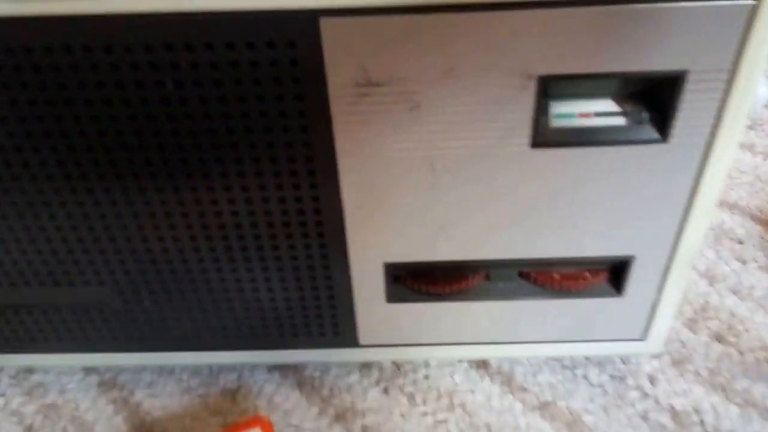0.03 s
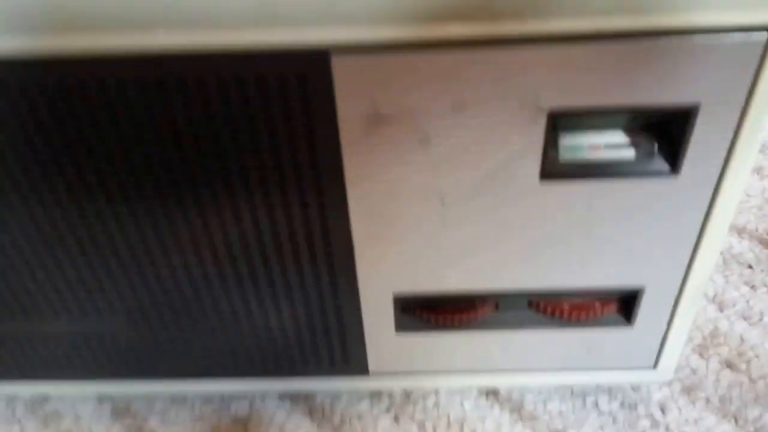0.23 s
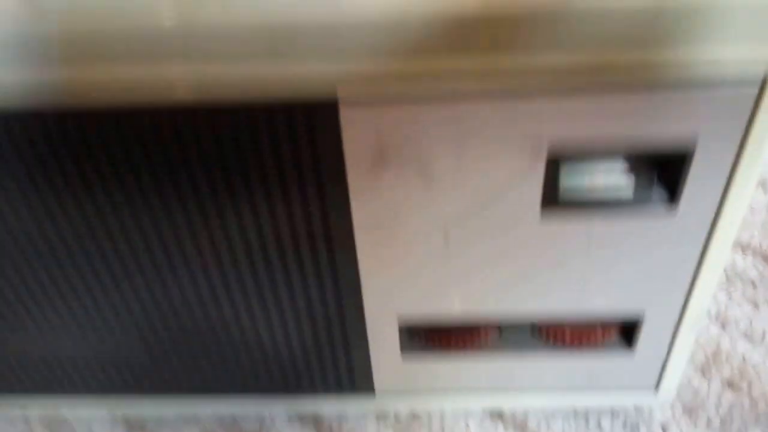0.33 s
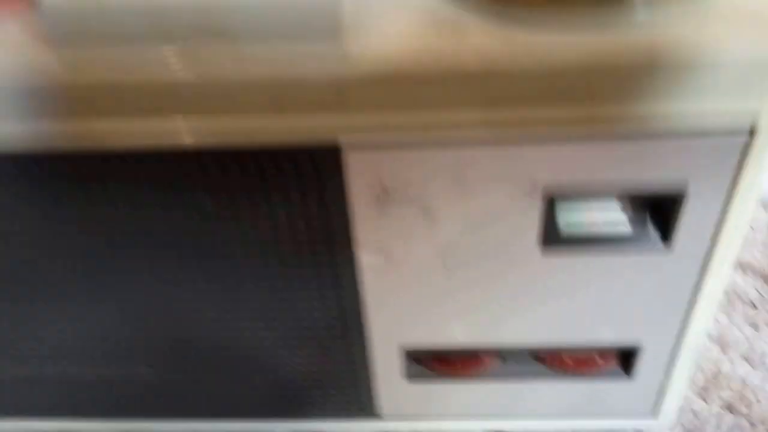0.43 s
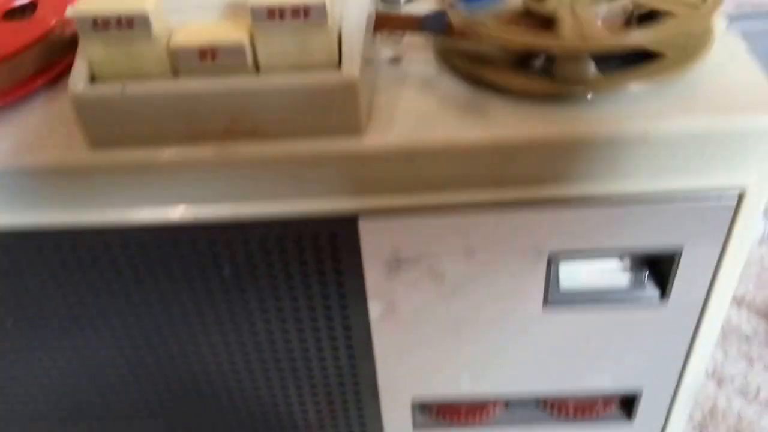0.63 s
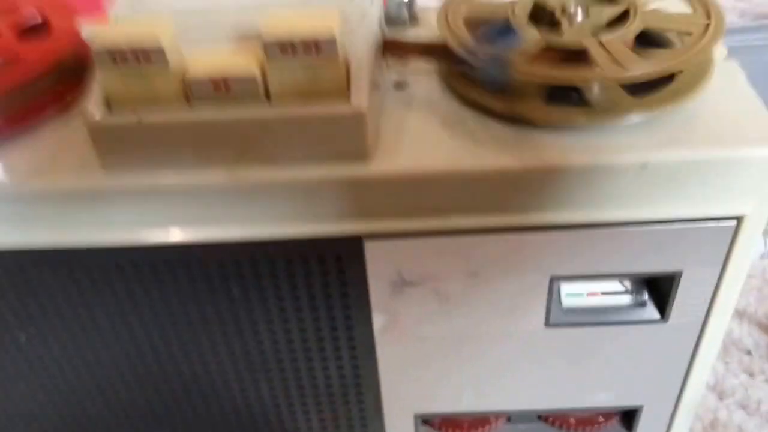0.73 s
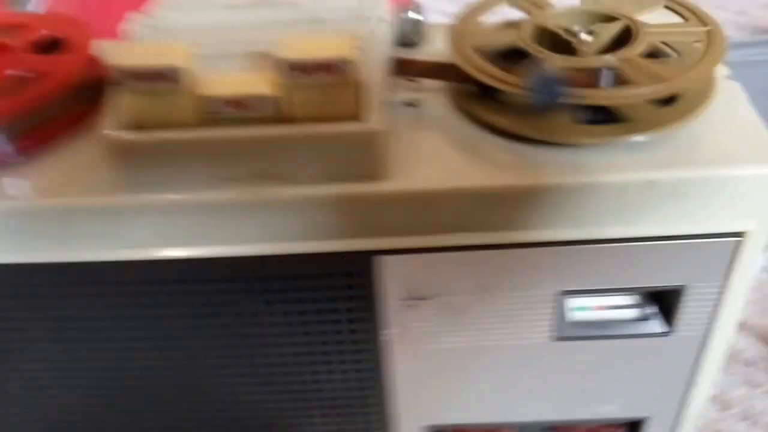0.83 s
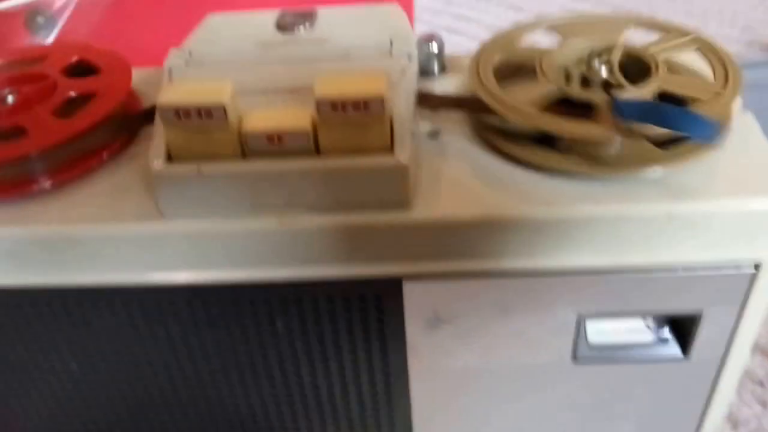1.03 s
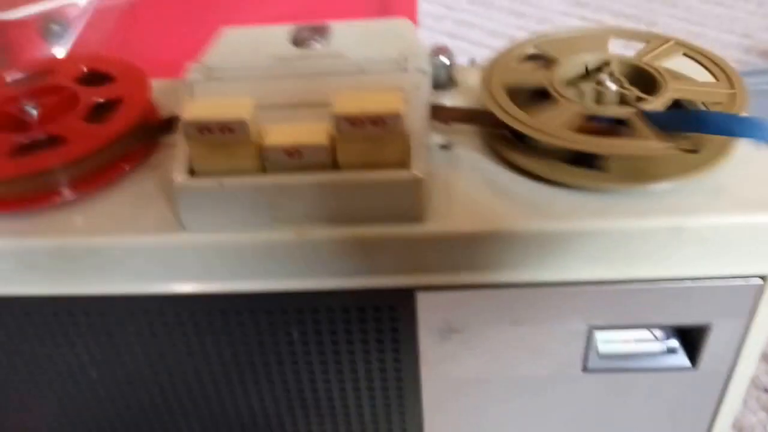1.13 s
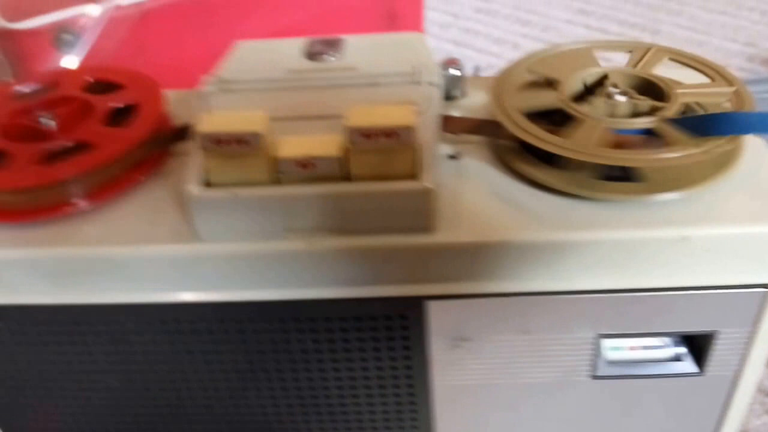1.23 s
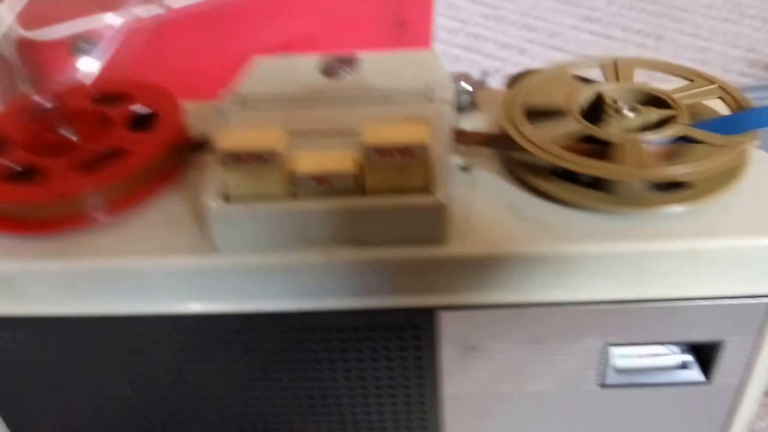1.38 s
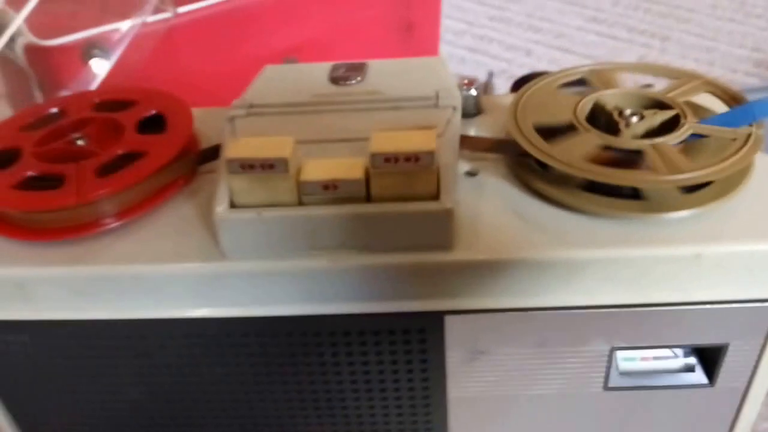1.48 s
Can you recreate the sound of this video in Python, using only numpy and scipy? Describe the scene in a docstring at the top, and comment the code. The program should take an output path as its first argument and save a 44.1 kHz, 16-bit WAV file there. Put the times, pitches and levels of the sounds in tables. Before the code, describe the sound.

A small reel-to-reel tape machine runs throughout in a quiet room, with a low hum and soft knocks about thirteen times a second. Rubbing and ticks at the microphone's left end in a loud, sharp click and dull thump at 0.25 seconds. Faint tape hiss follows, with a thin whistle near 0.5 seconds and light handling ticks. The machine grows slightly quieter, and tiny high reel chirps come from 1.2 seconds.

```python
"""Small reel-to-reel, up close

A tape machine runs in a quiet room: its motor hums and a wheel knocks in the cabinet once a turn.
A hand-held microphone drifts over it; something rubs, then clicks sharply with a thump at the
microphone's left port. Afterwards the tape hisses faintly and the reels tick and chirp."""
import sys
import numpy as np
from scipy import signal
from scipy.fft import rfft, irfft
from scipy.io import wavfile

SR = 44100
rng = np.random.default_rng(int(sys.argv[2]) if len(sys.argv) > 2 else 0)


def log_audio(samples):
    """Write samples as a 16-bit WAV file to the path given in sys.argv[1]."""
    # one column per channel
    frames = np.atleast_2d(samples).T
    # limit to full scale, then quantise
    limited = np.clip(frames, -1, 1)
    pcm = np.round(limited * 32767).astype(np.int16)
    wavfile.write(sys.argv[1], SR, pcm)


N = 68355


def amp(db):
    """Decibels to gain."""
    return 10 ** (np.asarray(db) / 20)


def clock():
    """Time of each sample in seconds."""
    return np.arange(N) / SR


def curve(rows):
    """One automation lane per column, with straight ramps."""
    times, *columns = np.array(rows, float).T
    return [np.interp(clock(), times, c) for c in columns]


def pan(x, db):
    """Pan by turning the far side down; positive is left."""
    return x * amp(np.array([np.minimum(db, 0), np.minimum(-db, 0)]).reshape(2, -1))


def response(eq):
    """Minimum-phase click with the given EQ, peak 1."""
    hz, db = np.array(eq, float).T
    size = 2 ** 12
    bins_hz = np.arange(size // 2 + 1) * SR / size
    gain = amp(np.interp(np.log(bins_hz + 1), np.log(hz), db))
    cepstrum = irfft(np.log(gain))
    cepstrum[1:size // 2] *= 2
    cepstrum[size // 2 + 1:] = 0
    impulse = irfft(np.exp(rfft(cepstrum)))
    return impulse / np.abs(impulse).max()


def through(x, impulse):
    """Play x through an impulse response."""
    return signal.fftconvolve(x, impulse)[:N]


def noise(eq):
    """Coloured noise, rms 1."""
    y = irfft(rfft(rng.standard_normal(N)) * rfft(response(eq), N), N)
    return y / y.std()


def wide(eq, mono):
    """Stereo noise with a mono share common to both sides."""
    return np.sqrt(mono) * noise(eq) + np.sqrt(1 - mono) * np.array([noise(eq), noise(eq)])


def walk(rate_hz):
    """Random wander, spread near 1."""
    steps = rng.standard_normal(2 ** 11)
    return np.interp(clock() * rate_hz, np.arange(len(steps)), steps)


def pulses(rows):
    """One impulse for each (time [s], level [dB])."""
    y = np.zeros(N)
    for s, db in rows:
        y[int(np.clip(s * SR, 0, N - 1))] += amp(db)
    return y


def ring(modes):
    """Sum of decaying modes."""
    t = clock()
    return sum(amp(db - 60 * t / t60) * np.sin(2 * np.pi * hz * t) for hz, db, t60 in modes)


def burst(age, rise, hold, fall):
    """Envelope that swells up to age 0, holds and dies away; times in seconds."""
    return np.exp(np.minimum(age, 0) / rise - np.maximum(age - hold, 0) / fall)


# Room tone EQ (frequency [Hz], gain [dB])
ROOM_EQ = [(25, 1), (60, -7.5), (140, 6.5), (300, 3), (800, -10.5), (1300, -2), (2500, -11), (5000, -14),
           (7000, -21.5), (8500, -25.5), (14500, -27.5), (15500, -54.5)]

def room():
    """A wide, quiet bed of room air."""
    return wide(ROOM_EQ, mono=0.067) * amp(-70.5)


# Fader ride on the cabinet's low ring (time [s], gain [dB], pan [dB])
DRIFT = [(0, 2, 6), (.3, 2, 4), (.55, 0.5, 6.5), (.85, -4.5, 2.5), (1.2, -8.5, 0.5), (1.55, -9, 0)]

def mic_drift(x):
    """The sound fades and centres as the microphone moves away."""
    db, side = curve(DRIFT)
    return pan(x * amp(db), side)


# Hum at the microphone (time [s], level [dB], pan [dB])
HUM_RIDE = [(0.0, -51.5, 12), (0.056, -54.5, 9.5), (0.084, -78, 3), (0.114, -54.5, 8), (0.21, -52.5, 3),
            (0.32, -52, 4.0), (0.696, -57, 5), (0.894, -56.5, 2.5), (0.966, -57.5, 7), (1.046, -65.5, -2),
            (1.084, -57, 1), (1.114, -75, 0.5), (1.144, -59, 2.5), (1.2, -56, 4.0), (1.258, -69, -2),
            (1.286, -62.5, 2.0), (1.326, -71, -1.0), (1.382, -54, 0), (1.454, -59.5, 4.0), (1.55, -69, 0.0)]
# Lesser drive tones (frequency [Hz], level [dB])
DRIVE_TONES = [(69.6, -24.5), (118.8, -20.5), (247.4, -22), (279, -22.5)]

def motor():
    """The motor hums, fluttering and sagging slightly; weaker drive tones follow its speed."""
    hum_hz, sag_hz_per_s, flutter = 169.9, 0.9, 0.0013
    speed = (1 - sag_hz_per_s * clock() / hum_hz) * (1 + flutter * walk(36))
    phase_per_hz = 2 * np.pi * np.cumsum(speed) / SR
    db, side = curve(HUM_RIDE)
    hum = np.sqrt(2) * amp(db + 0.5 + np.abs(side) / 3) * np.sin(hum_hz * phase_per_hz)
    tones = sum(amp(level + 2 * walk(6.1)) * np.sin(hz * phase_per_hz + rng.uniform(0, 2 * np.pi))
                for hz, level in DRIVE_TONES)
    return pan(hum, side) + mic_drift(tones * amp(-47.5))


# Drive rumble EQ (frequency [Hz], gain [dB])
RUMBLE_EQ = [(25, -21), (70, -13), (130, 0.5), (220, -10.5), (330, -12), (520, -0.5), (760, -20),
             (1200, -16), (2200, -34), (8000, -51)]

def rumble():
    """Low running noise of the drive."""
    return mic_drift(wide(RUMBLE_EQ, mono=0.73) * amp(-60.5))


# Rub fader ride (time [s], level [dB])
RUB_RIDE = [(0, -54), (.025, -55), (.045, -66.5), (.085, -56), (.13, -63), (.19, -64), (.22, -64),
            (.238, -45.5), (.262, -55), (.28, -63), (.31, -80.5)]
# Rub EQ (frequency [Hz], gain [dB])
RUB_EQ = [(25, -1.5), (100, 13), (250, 4), (700, 0.5), (1800, -11), (4500, -11.5), (5800, -15),
          (7200, -53.5), (16000, -49.5)]

def rub():
    """Grainy rubbing at the left port."""
    friction = noise(RUB_EQ) * amp(curve(RUB_RIDE)[0] + 5.5 + 0.87 * walk(300))
    return pan(friction, db=35)


# Knock accents, one per turn (level [dB])
KNOCK_ACCENTS = [-0.12, 2.6, 1.7, 2, 0.98, 2.1, 1.8, 0.83, 2, 0.45, -0.84, 0.9, -0.94, -1.73, 1.8, -0.62,
                 -2.3, 0.97, 0.26, -0.64]
# Cabinet resonances (frequency [Hz], level [dB], t60 [s])
CABINET_MODES = [(433, -10.5, 0.2), (468, -1, 0.15), (514, 0, 0.16), (537, -7, 0.14), (625, 1.5, 0.17),
                 (828, -10.5, 0.045), (1106, -8, 0.062), (1212, -6.5, 0.048), (1310, -20.5, 0.022),
                 (1473, -13.5, 0.053), (1707, -10.5, 0.02), (1990, -11, .022)]
# Softer throbs after each knock (delay [s], frequency [Hz], level [dB])
THROBS = [(0.029, 520.7, 2), (.043, 522, -4), (.056, 470.3, -3.5)]
# Panel bounces on each knock (delay [s], level [dB])
BOUNCES = [(0, -2), (.0058, -9.5), (.0116, -6.5)]
# Loose-part chatter EQ (frequency [Hz], gain [dB])
CHATTER_EQ = [(200, -24), (500, -1.5), (800, -13.5), (1250, 10), (1550, -3.5), (2050, -5), (2600, -20),
              (16000, -52)]

def wheel():
    """One soft knock a turn rings the cabinet, rattles its panels and shakes loose parts."""
    first_s, turn_s, attack_s, throb_width_s, crossover_hz = 0.0407, 0.07702, 0.001, 0.0051, 750
    t = clock()
    knocks = pulses(zip(first_s + turn_s * np.arange(len(KNOCK_ACCENTS)), KNOCK_ACCENTS))
    attack = 1 - np.exp(-(t / attack_s) ** 2)
    throbs = sum(amp(db) * np.exp(-((t - s) / throb_width_s) ** 2) * np.sin(2 * np.pi * hz * t)
                 for s, hz, db in THROBS)
    low_ring = attack * ring(m for m in CABINET_MODES if m[0] < crossover_hz)
    high_ring = attack * ring(m for m in CABINET_MODES if m[0] >= crossover_hz)
    body = through(knocks, low_ring + throbs) * amp(-53)
    panels = through(through(knocks, pulses(BOUNCES)), high_ring) * amp(-53)
    shake = through(knocks, attack * burst(t, rise=1, hold=0.006, fall=0.011))
    chatter = wide(CHATTER_EQ, mono=0.23) * shake * amp(-62.5)
    return mic_drift(body) + pan(panels + chatter, db=2 - 3 * t)


# Handling tick cues (time [s], level [dB], pan [dB])
TICK_CUES = [(0.0661, -28.5, 31), (0.1555, -27, 43), (0.2002, -47, 10), (0.2392, -23, 22),
             (0.753, -48, -26), (0.8877, -40, -27.5), (0.9098, -45, -31), (.9150, -40.5, -31),
             (1.0145, -44.5, -26), (1.029, -47.5, -12), (1.441, -48, -26)]
# Tick EQ (frequency [Hz], gain [dB])
TICK_EQ = [(100, -3), (800, 1), (2500, 5), (4500, 1.5), (5800, -5.5), (7500, -31), (15000, -43.5)]

def ticks():
    """Dry handling ticks; the harder the pan, the tighter the noise tail."""
    out = 0
    for s, db, side in TICK_CUES:
        envelope = burst(clock() - s, rise=0.0002, hold=0, fall=0.0051 * amp(-abs(side) / 2))
        tail = 0.075 * amp(db) * rng.standard_normal(N) * envelope
        out += pan(through(pulses([(s, db)]) + tail, response(TICK_EQ)), side)
    return out


# Snap cues (time [s], peak [dB])
SNAP_CUES = [(.2449, -30.5), (.2484, -18), (.2541, -35), (.2571, -4.5)]
# Snap and scrape EQs (frequency [Hz], gain [dB])
SNAP_EQ = [(100, -21), (1000, -28), (2500, -10.5), (4000, -4), (5400, 3.5), (6500, -0.5), (8000, -17.5),
           (11000, -21), (15000, -20.5), (16500, -39.5)]
SCRAPE_EQ = [(40, -16), (250, 7.5), (330, -2.5), (430, 1.5), (550, 7.5), (760, -6.5), (1250, 0.5),
             (1800, -10), (4000, -7), (6200, -9), (8000, -32), (15000, -32), (16500, -39)]

def click():
    """A few hard snaps around a short scrape, right at the left port."""
    envelope = burst(clock() - 0.2495, rise=0.002, hold=0.011, fall=0.0017)
    scrape = noise(SCRAPE_EQ) * amp(-24) * envelope
    snaps = through(pulses(SNAP_CUES), response(SNAP_EQ))
    return pan(scrape + snaps, db=43.5)


# Thump cues (time [s], level [dB], starting pitch [Hz], t60 [s], pan [dB])
THUMP_CUES = [(0.2563, -13.5, 103.6, 0.038, 37.5), (1.0191, -36, 112, 0.021, -23)]

def thumps():
    """Dull thumps through the microphone body, sagging in pitch."""
    sag_per_s, attack_s = 20, 0.0027
    out = 0
    for s, db, hz, t60, side in THUMP_CUES:
        age = np.maximum(clock() - s, 0)
        phase = 2 * np.pi * np.cumsum(hz * (age > 0) / (1 + sag_per_s * age)) / SR
        envelope = (1 - np.exp(-age / attack_s)) * amp(-60 * (age / t60) ** 1.71)
        out += pan(amp(db) * envelope * np.sin(phase), side)
    return out


# Hiss fader ride (time [s], level [dB])
BRUSH_RIDE = [(0, -123), (.26, -71.5), (.33, -75.5), (.42, -74), (.48, -73), (.56, -75), (.68, -74.5),
              (.76, -77), (1.05, -75), (1.2, -73), (1.33, -81), (1.46, -71), (1.55, -72.5)]
# Scuff cues (time [s], level [dB], decay [s])
SCUFF_CUES = [(0.5057, -59.5, 0.0058), (.545, -63, 0.0075), (0.636, -68.5, .012), (0.812, -63.5, 0.0027),
              (1.122, -59, 0.0029), (1.1806, -53.5, 0.007), (1.196, -65.5, 0.027), (1.233, -65.5, 0.042),
              (1.43, -64, 0.0035)]
# Brush and scuff EQs (frequency [Hz], gain [dB])
BRUSH_EQ = [(1000, -30), (3500, -9.5), (5000, -3), (6200, 0.5), (7300, 0.5), (7900, -10.5), (10000, -16.5),
            (15000, -32)]
SCUFF_EQ = [(1000, -26.5), (3000, -5), (4800, 2), (6000, 1.5), (7300, -2), (8300, -21), (15000, -34.5)]

def tape():
    """Tape brushes past the reel with a faint hiss and brief, gritty scuffs."""
    brush = noise(BRUSH_EQ) * amp(curve(BRUSH_RIDE)[0] + 0.75 * walk(150))
    grit = noise(SCUFF_EQ) * amp(6.45 * walk(540))
    scuffing = sum(amp(db) * burst(clock() - s, rise=0.0002, hold=0, fall=decay)
                   for s, db, decay in SCUFF_CUES)
    return brush + grit * scuffing


def whistle():
    """The tape whistles once, a thin band of noise."""
    start_s, pitch_hz, width_hz = 0.48, 7050, 600
    t = clock()
    band = np.real((walk(width_hz) + 1j * walk(width_hz)) * np.exp(2j * np.pi * pitch_hz * t))
    return band * amp(-67.5) * burst(t - start_s, rise=0.069, hold=0.048, fall=0.11)


# Chirp cues (time [s], level [dB])
CHIRP_CUES = [(1.234, -49), (1.2505, -51), (1.257, -51), (1.3345, -54), (1.3492, -55), (1.358, -46.5),
              (1.378, -51), (1.4115, -51.5), (1.435, -50), (1.455, -50.5), (1.4885, -48), (1.512, -48),
              (1.5285, -50.5)]
# Reel resonances (frequency [Hz], level [dB], t60 [s])
REEL_MODES = [(5610, -4, 0.038), (5807, 12, 0.0074), (6000, 1, 0.0075), (6300, -8, 0.0047)]

def reel():
    """The reel sticks and slips in tiny chirps, over a scatter of fainter ones."""
    faint_from_s, faint_per_s, attack_s, roughness = 0.94, 150, 0.0008, 0.16
    t = clock()
    slips = (rng.random(N) < faint_per_s / SR) * (t > faint_from_s)
    faint = slips * amp(-63 + 2 * rng.standard_normal(N))
    chirp = ring(REEL_MODES) * (1 - np.exp(-t / attack_s))
    chirp /= np.abs(chirp).max()
    return through(pulses(CHIRP_CUES) + faint, chirp) * (1 + roughness * walk(1000))


def port_lag(stereo, lag_s=0.00021):
    """The right port hears late; the lag shrinks as the microphone centres."""
    t = clock()
    left, right = stereo
    return np.array([left, np.interp(t - lag_s * (1 - t / t[-1]), t, right)])


def scene():
    """Machine and close handling over room tone, with tape and reel off to the left."""
    machine = motor() + port_lag(rumble() + wheel())
    handling = rub() + ticks() + click() + thumps()
    return room() + machine + handling + pan(tape() + whistle() + reel(), db=26)


def record(dry):
    """A steep low-pass trims the very top of the mix."""
    top_hz = 16650
    return signal.sosfilt(signal.ellip(8, .2, 70, top_hz, fs=SR, output="sos"), dry)


dry = scene()
out = record(dry)
log_audio(out)
```